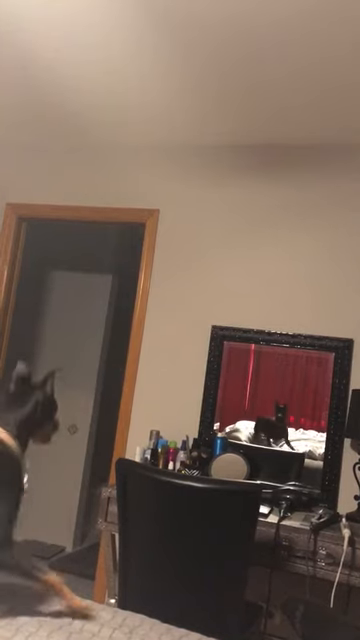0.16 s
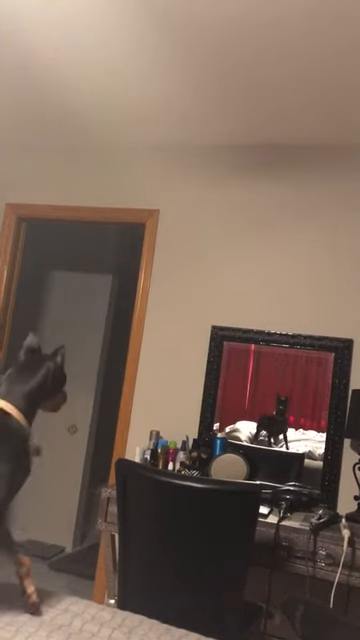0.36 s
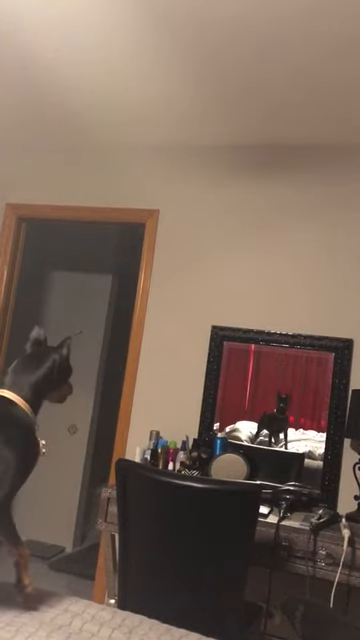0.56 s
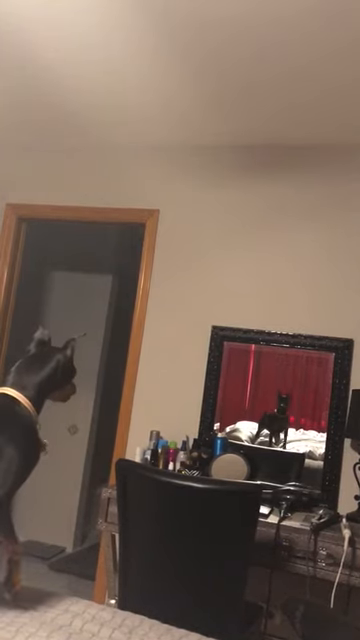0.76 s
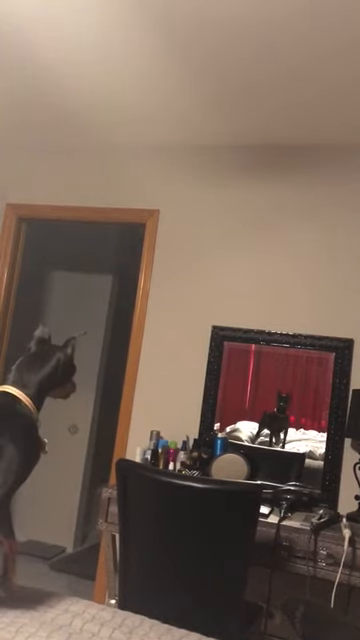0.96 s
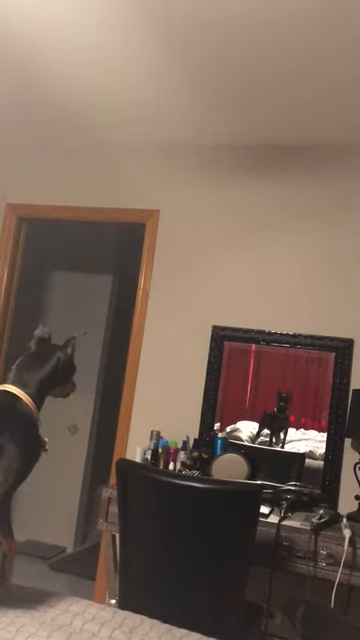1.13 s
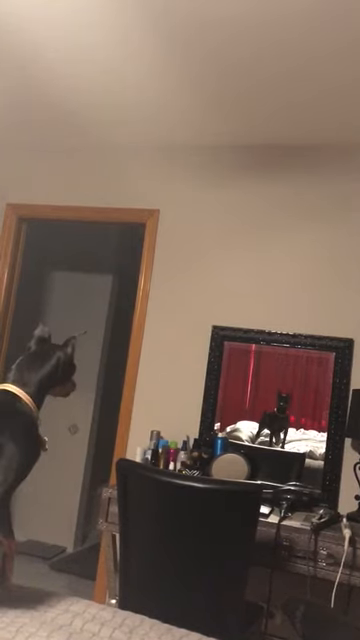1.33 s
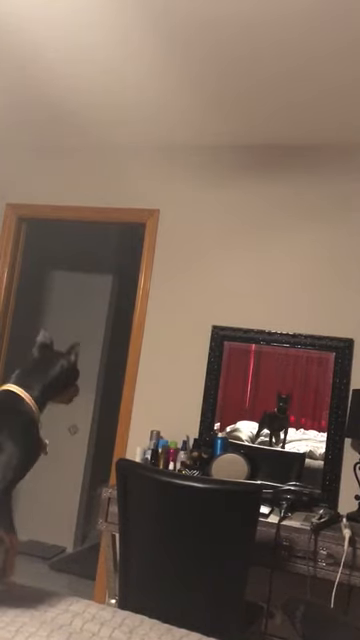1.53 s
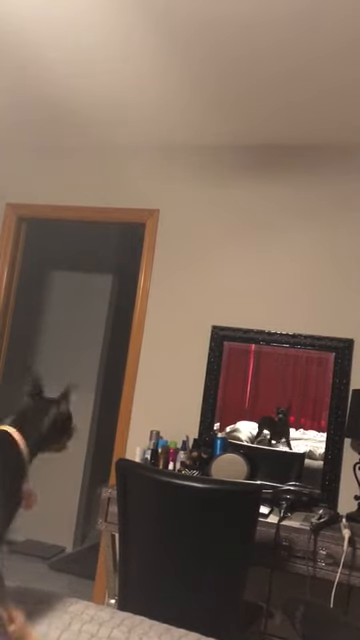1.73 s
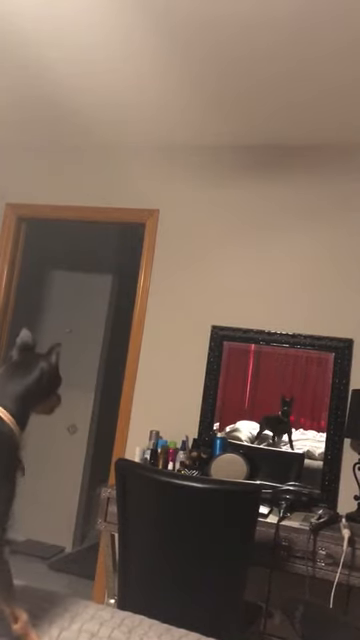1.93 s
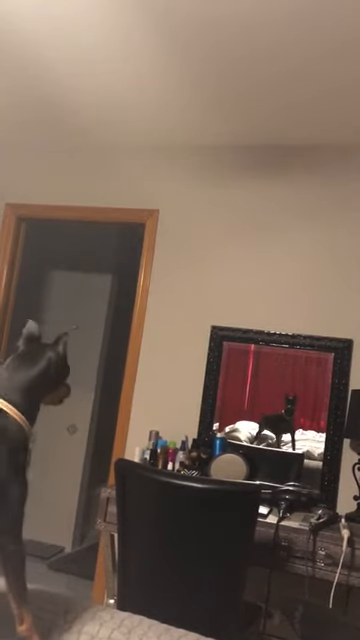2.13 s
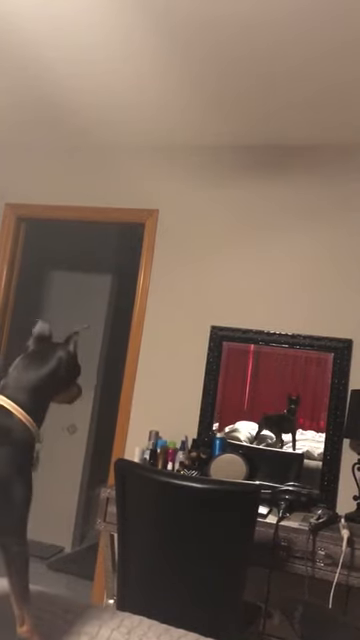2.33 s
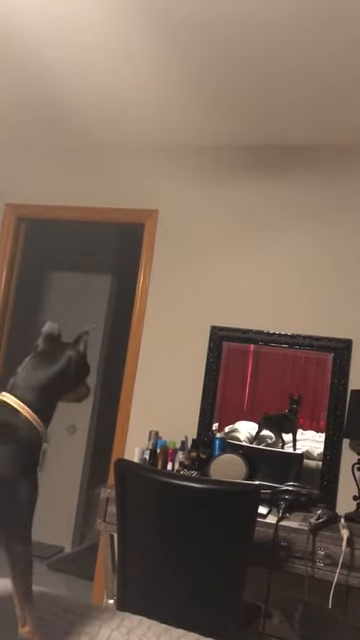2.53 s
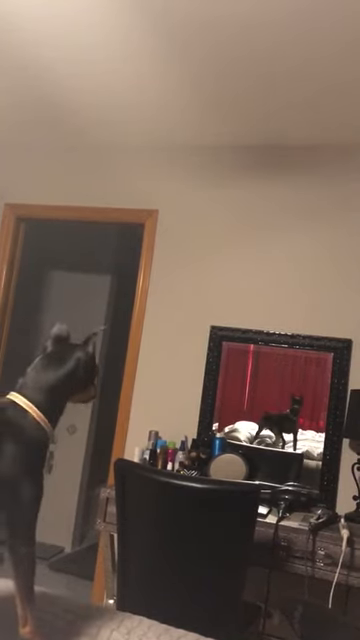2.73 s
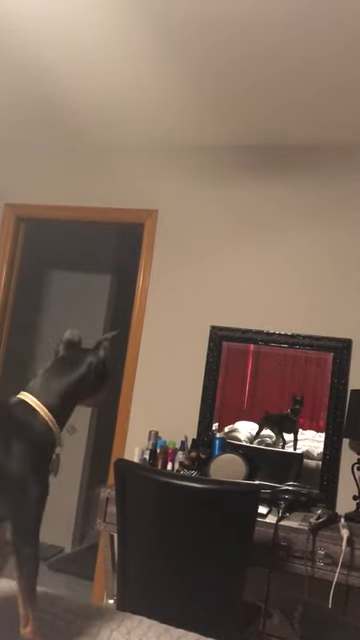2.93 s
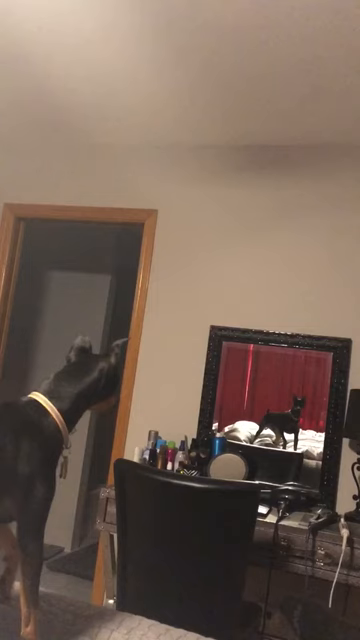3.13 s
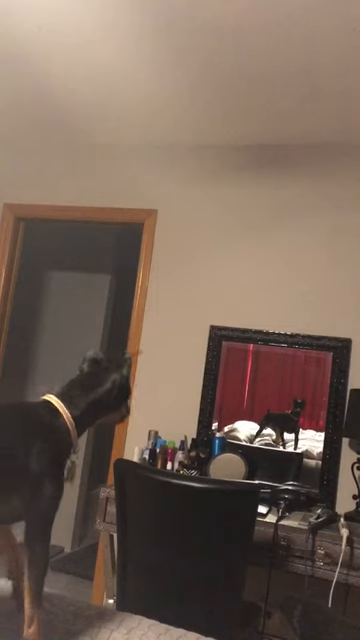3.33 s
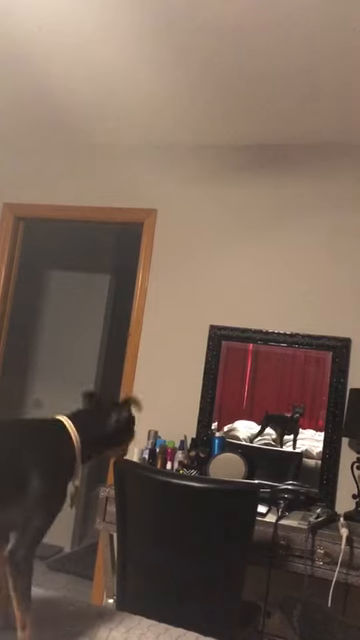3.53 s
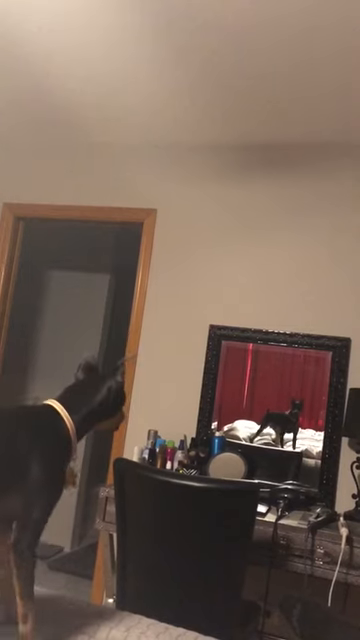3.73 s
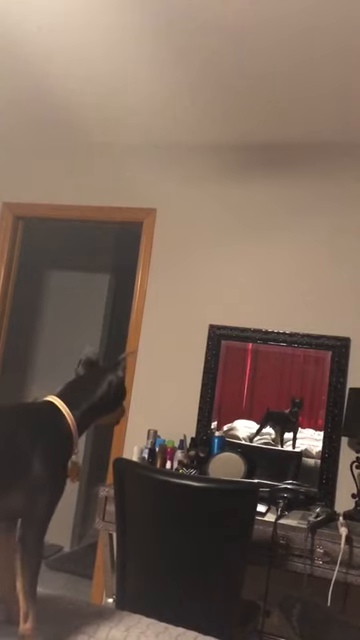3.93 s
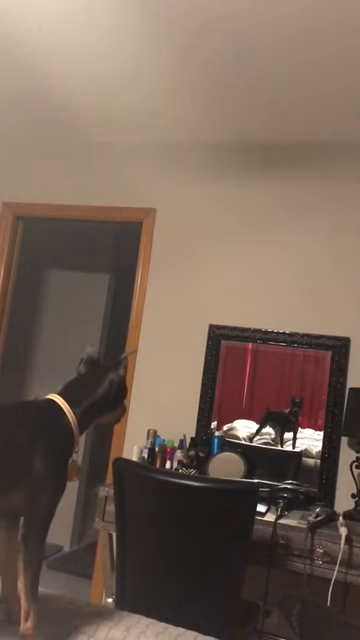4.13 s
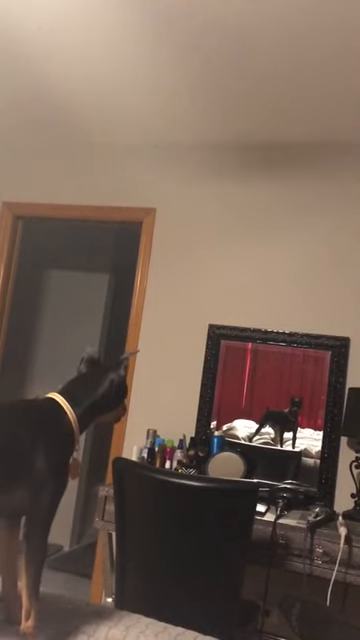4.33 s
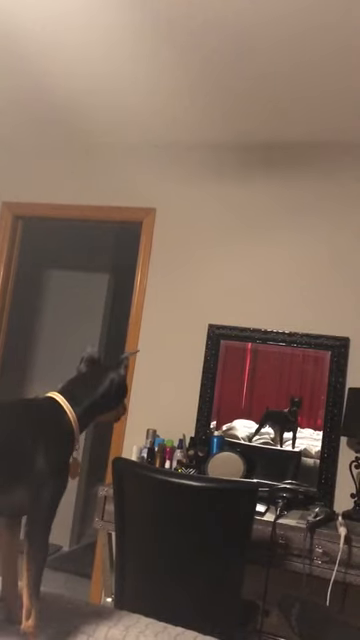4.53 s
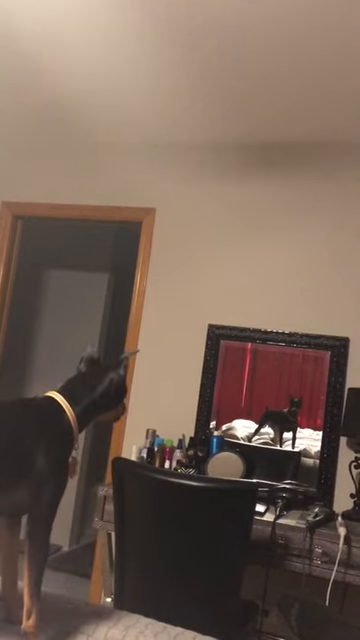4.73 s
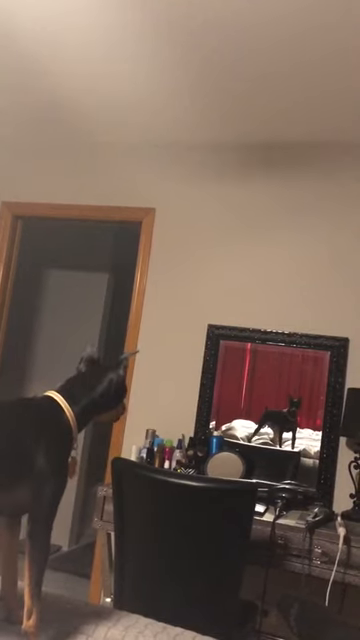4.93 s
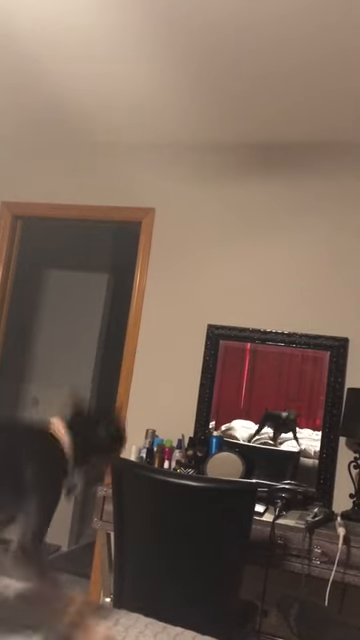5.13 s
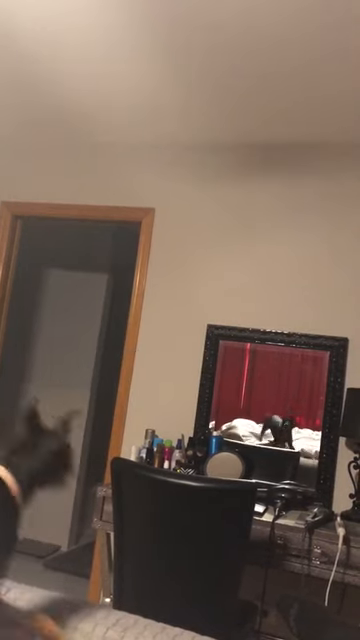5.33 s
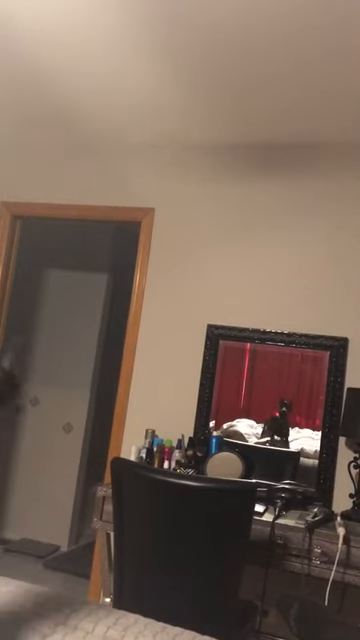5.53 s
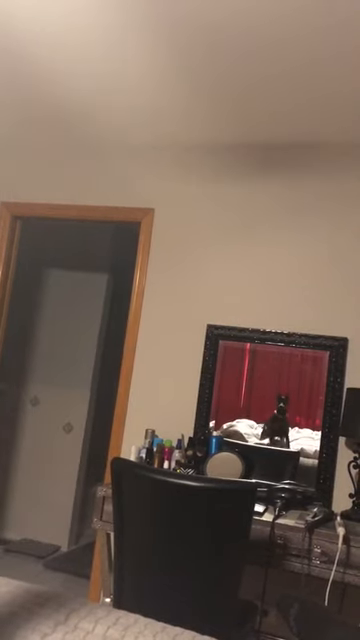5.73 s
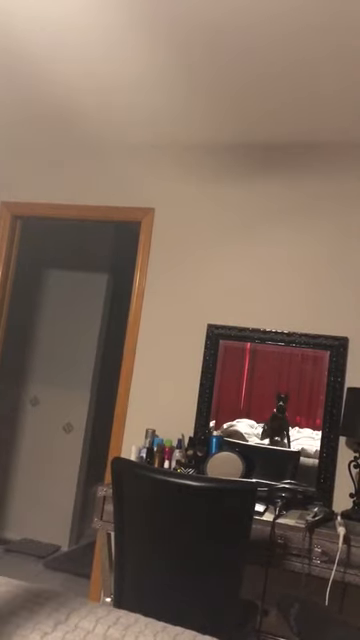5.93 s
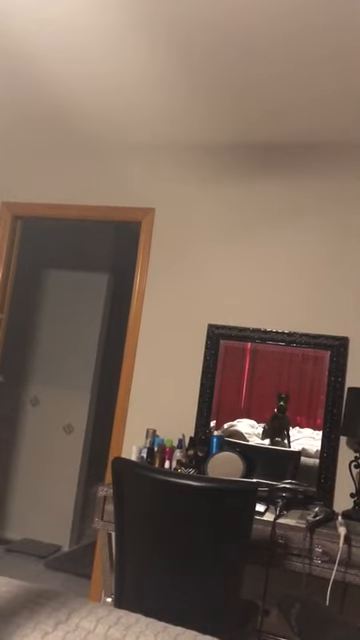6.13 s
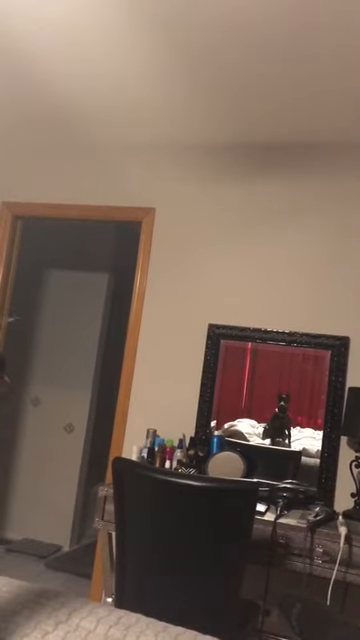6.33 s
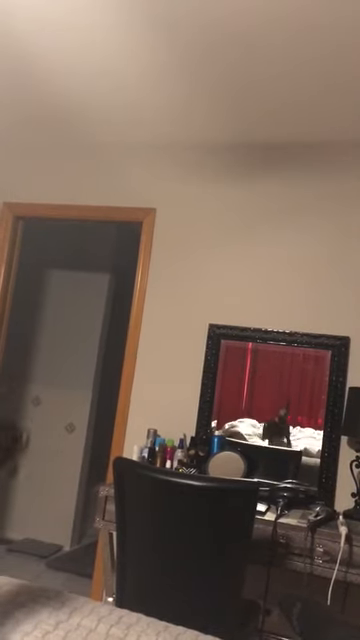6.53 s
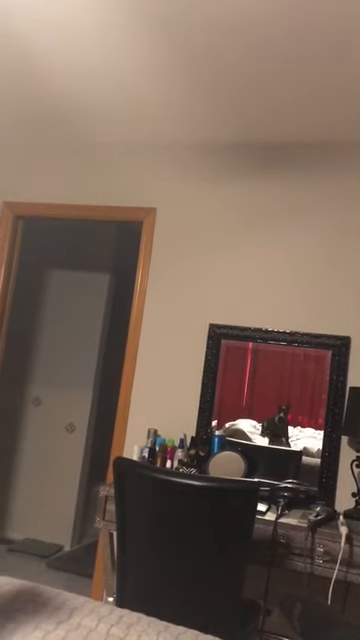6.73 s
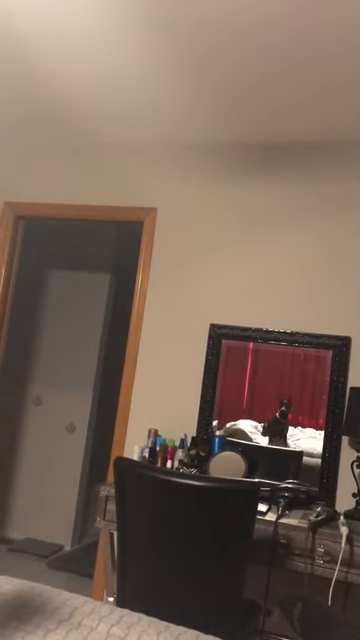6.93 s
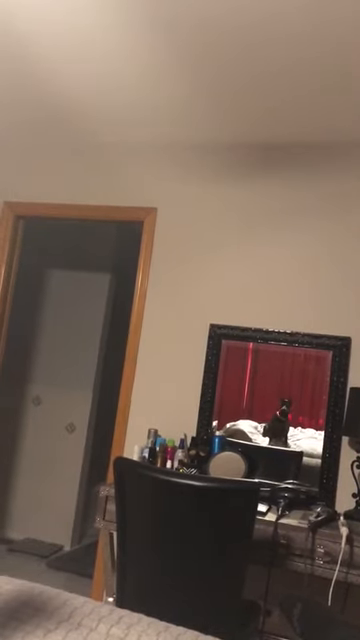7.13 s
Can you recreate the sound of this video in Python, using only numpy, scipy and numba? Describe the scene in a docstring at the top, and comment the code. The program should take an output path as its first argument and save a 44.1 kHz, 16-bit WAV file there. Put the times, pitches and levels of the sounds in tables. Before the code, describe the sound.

Four single raspy dog barks close by indoors, some led in by throaty clicks, with bright tag jingles and quiet mains hum.

```python
"""A small dog barks hoarsely in a bedroom, close to a phone: irregular pulses of the vocal folds and gated breath
drive mouth resonances that rise as the jaw opens. Slow throat clicks lead into the first three full barks.
Collar tags jingle when the dog moves, each contact a click, a ring of small metal discs and a rattle.
A machine hums on the mains over faint room air; bedroom and hallway answer the dog, and the phone limits the peaks."""
import sys
import numpy as np
from scipy import signal
from scipy.fft import rfft, irfft, next_fast_len
from scipy.io import wavfile
from scipy.ndimage import uniform_filter1d, minimum_filter1d, map_coordinates
from numba import njit

SR = 44100
rng = np.random.default_rng(int(sys.argv[2]) if len(sys.argv) > 2 else 0)


def unload_audio(sound):
    """Save the sound as a 16-bit wav file, at the path given as the first command line argument."""
    columns = np.transpose(np.atleast_2d(sound))
    # keep every value between -1 and 1, then stretch to whole-number steps
    steps = np.round(np.clip(columns, -1, 1) * 32767)
    wavfile.write(sys.argv[1], SR, steps.astype(np.int16))


def rack_gain(trim_db):
    """Turn a fader trim in dB into the linear factor to multiply a signal by."""
    fader = np.asarray(trim_db, float)
    return 10 ** (fader / 20)


N = 316197  # samples heard
LEAD = SR // 2  # the dog is rendered from half a second early, so that earlier echoes reach the start
LONG = N + LEAD


def unit(x):
    """Scaled to rms 1."""
    return x / np.sqrt(np.mean(x ** 2) + 1e-20)


def along(points, hz):
    """(Hz, value) points read on a log frequency axis."""
    f, v = np.transpose(points)
    return np.interp(np.log(hz + 1), np.log(f + 1), v)


def filtered(x, response):
    """x times a complex response of frequency."""
    m = next_fast_len(len(x) + 8192)
    spectrum = rfft(x, m) * response(np.fft.rfftfreq(m, 1 / SR))
    return irfft(spectrum, m)[:len(x)]


def wobble(rate):
    """A smooth random curve, rate knots a second."""
    knots = rng.standard_normal(int(N * rate / SR) + 4)
    return map_coordinates(knots, [np.arange(N) * rate / SR])


@njit
def resonance(x, hz, width):
    """A moving two-pole resonance, gain 1 at its centre (hz and width as parts of the sample rate)."""
    y, r = np.zeros(len(x)), np.exp(-np.pi * width)
    for i in range(2, len(x)):
        drive = (1 - r * r) / 2 * (x[i] - x[i - 2])
        y[i] = drive + 2 * r * np.cos(2 * np.pi * hz[i]) * y[i - 1] - r * r * y[i - 2]
    return y


def ring_at(x, hz, width_hz):
    """A narrow peak with steep skirts: four resonances in a row, scaled to rms 1."""
    for widen in (1, 4, 5, 6):
        x = resonance(x, hz / SR, widen * width_hz / SR)
    return unit(x)


def bark(rows, opening_s, parting_db, wide_db, easing_db, third_db, wide, closed, squeak_hz, squeak_db):
    """Irregular fold pulses and gated breath through three moving mouth resonances and the chest."""
    # mouth resonances by jaw (0 shut, 1 wide, 2 easing): jaw, first_hz, second_hz, third_hz
    jaw_table = [(0, 490, 1220, 1830), (.27, 687.2, 1400, 1960), (.6, 750, 1549, 2070),
                 (1, 894, 1572, 2405), (2, 990, 1600, 2324)]
    # what the jaw lets out, relative levels: jaw, chest_db, breath_db, lip_squeak_db
    tone_table = [(0, 2.5, -39, 3), (.22, -6, -44, 1.5), (.5, -32, -28.5, -18), (1.1, -48, -21, -20),
                  (1.6, -40.5, -23, -20.5), (2.2, -38.5, -17.5, -20.5)]
    # third resonance while the jaw opens, relative level: jaw, level_db
    third_table = [(0, -33), (.22, -23), (.5, -8), (1.1, -3.5)]
    # breath spectrum, relative density: frequency_hz, level_db (per Hz)
    breath_spectrum = [(1590, -21.5), (2700, -10.5), (2910, -10), (3350, -10), (4860, -20.5), (5400, -16.5),
                       (5860, -16.5), (8190, -12.5), (9640, -20), (12900, -22.5), (16000, -48)]
    # upper breath resonances: multiple of the third resonance, width_hz, level_db over the plain breath
    upper_peaks = [(1.4, 450.8, -11), (2.55, 400, -19.5), (3.402, 900, -20)]
    s, push_db = np.transpose(rows)
    length = s[-1] - s[0]
    t = np.arange(0, length + .05, 1 / SR)
    effort = np.interp(t + s[0], s, push_db)
    jaw = t / opening_s

    def follow(table):
        """Each column as the jaw moves."""
        places, *columns = np.transpose(table)
        return [np.interp(jaw, places, column) for column in columns]

    first_db = np.interp(jaw, [.3, 1, 1.6], [parting_db, wide_db, easing_db])
    f1, f2, f3 = follow(jaw_table)
    chest, breath, squeak = follow(tone_table)
    top_db, = follow([*third_table, (1.6, third_db)])
    open_share = np.clip(jaw, 0, 1)
    f1 = f1 * wide ** open_share
    f2 = f2 * closed ** (1 - open_share)
    fade = np.clip((length + 0.008 - t) / 0.046, 0, 1) * np.clip(t / .007, 0, 1)

    # the folds speed up at the onset, and their beats scatter in time and strength
    cycle = np.cumsum(np.interp(t, [0, .07], [180, 300])) / SR
    draw = rng.standard_normal((120, 2))
    beats = np.cumsum(np.exp(.25 * draw[:, 0])) - .6
    pulses = np.zeros(len(t) + 1)
    np.add.at(pulses, np.searchsorted(cycle, beats), rack_gain(2.0 * draw[:, 1]))
    pulses = pulses[:-1]
    gate = unit(np.convolve(pulses, np.hanning(120))[:len(t)])  # air rushes just after each opening

    def hiss(steady):
        """Breath noise gated by the folds, over a steady share."""
        return unit((gate + steady) * rng.standard_normal(len(t)))

    rough = 0.26
    folds = (1 - rough) * unit(pulses) + rough * hiss(0.1)
    voice = rack_gain(first_db) * ring_at(folds, f1, 120)
    voice = voice + rack_gain(-2.5) * ring_at(folds, f2, 170)
    voice = voice + rack_gain(top_db) * ring_at(folds, f3, 220)
    voice = voice + rack_gain(-10) * ring_at(hiss(.3), (f1 + f2) / 2, 200)  # rasp fills the valley between the first two
    voice = voice + rack_gain(chest + parting_db) * ring_at(folds, np.full(len(t), 230.), 160)

    lumps = np.interp(cycle, np.arange(0, 120, 3), rng.standard_normal(40))  # the breath comes in uneven gusts
    gusts = rack_gain(3.7 * lumps) * hiss(.9)
    air = unit(filtered(gusts, lambda hz: rack_gain(along(breath_spectrum, hz))))
    air = air + sum(rack_gain(db) * ring_at(air, k * f3, width_hz) for k, width_hz, db in upper_peaks)
    air = air + rack_gain(squeak + squeak_db) * ring_at(hiss(.9), np.full(len(t), float(squeak_hz)), 360)
    return fade * rack_gain(effort) * (voice + rack_gain(breath + 4.0) * air)


def barks():
    """Every bark at its moment, each with its own push of breath, mouth and lips."""
    # the bark that ends just before the start, relative level: time_s, effort_db
    earlier = [(-.31, -10.5), (-.13, -3)]
    # one list a bark, relative level: time_s, effort_db
    efforts = [
        [(1.6, -37.5), (1.634, -17), (1.652, -9), (1.776, -15), (1.79, -18)],
        [(3.46, -47.5), (3.464, -36.5), (3.486, -15.5), (3.532, -9), (3.614, -15.5), (3.626, -16),
         (3.64, -18.5)],
        [(5.125, -34), (5.145, -14), (5.169, -4.5), (5.301, -14.5), (5.33, -15.5)],
        [(6.495, -15.5), (6.505, -18), (6.517, -8), (6.659, -13), (6.67, -15.5)],
    ]
    # each bark's mouth, relative levels: jaw_opening_s, parting_db (first resonance and chest),
    # first_wide_db, first_easing_db, third_easing_db
    mouths = [(0.093, 5.5, -1, -2.5, -11), (.122, -2.5, -5, 4, -15.5), (.105, -2, -4, 3, -24),
              (.094, -5, -5.5, -5, -10), (.075, -9.5, -0.5, -4, -10)]
    # each bark's lips: first resonance multiple when wide, second resonance multiple when shut,
    # squeak_hz, squeak_db (added to what the jaw lets out)
    lip_shapes = [(.97, 1.3, 4950, -10), (.93, 1.04, 2200, -13), (1, .97, 4900, -2),
                  (1.03, 1.02, 5000, -4.5), (1.03, .92, 5250, -2.5)]
    out = np.zeros(LONG)
    for rows, mouth, lips in zip([earlier, *efforts], mouths, lip_shapes):
        call = bark(rows, *mouth, *lips)
        out[LEAD + round(rows[0][0] * SR):][:len(call)] += call
    return out


def tail(decay):
    """A second of echo with energy 1, each frequency dying at its own speed."""
    hz, t, z = signal.stft(rng.standard_normal(SR), SR, nperseg=256)
    fading = z * rack_gain(-60 * t / along(decay, hz)[:, None])
    echo = signal.istft(fading, SR, nperseg=256)[1][:SR]
    return echo / np.linalg.norm(echo)


def room(x, wet_db, far_db, piece=SR // 4):
    """Direct sound plus the walls' and the hallway's answer, which changes as the dog moves."""
    # bedroom decay: frequency_hz, t60_s
    bedroom = [(200, 0.32), (800, 0.26), (1600, 0.27), (2500, 0.26), (4000, 0.33), (8000, 0.22),
               (14000, 0.06)]
    # decay beyond the open door: frequency_hz, t60_s
    hallway = [(300, 0.43), (900, 0.53), (2400, 0.56), (4000, 0.6), (8000, 0.42)]
    out = np.pad(x, (0, 2 * SR))
    for a in range(0, len(x), piece):
        echo = rack_gain(wet_db) * tail(bedroom) + rack_gain(far_db) * tail(hallway)
        wet = signal.fftconvolve(x[a:a + piece], np.pad(echo, (130, 0)))  # the answer lags by 3 ms
        out[a:a + len(wet)] += wet
    return out[LEAD:LONG]


def hum():
    """Slightly unsteady mains lines over the faint air of the room."""
    # the machine's lines, about which level and phase wander: frequency_hz, level_db (rms)
    mains_lines = [(59.2, -66), (118.4, -63.5), (242.2, -80.5), (290.7, -87), (360.7, -84), (662.1, -91),
                   (721.4, -85.5), (839.8, -88.5)]
    # spectrum of the room air, relative density: frequency_hz, level_db (per Hz)
    air_spectrum = [(24, -35.5), (40, -6.5), (124, -11), (144, -5), (176, -13), (297, -14.5), (529, -22.5),
                    (715, -24.5), (790, -25), (1180, -23.5), (2630, -34), (11600, -39.5), (16000, -45)]
    t = np.arange(N) / SR
    lines = np.zeros(N)
    for hz, db in mains_lines:
        level = np.sqrt(2) * rack_gain(db + 1.5 * wobble(1.7))
        lines += level * np.sin(2 * np.pi * hz * t + wobble(4))
    air = unit(filtered(rng.standard_normal(N), lambda hz: rack_gain(along(air_spectrum, hz))))
    return lines + rack_gain(-66 + .7 * wobble(7.1)) * air


def tags():
    """Contacts click and ring small metal discs by where they touch, rebound twice and rattle with light bounces."""
    # the tags meet, relative levels: start_s, click_db, low_ring_db, high_ring_db (both over the click),
    # first_rebound_db (over the first contact)
    jingle = [(-.03, -42.5, -18, -8.5, -2.5), (0.0603, -49, -16, -13.5, -4), (0.104, -36.5, -20, -20, -15),
              (0.1424, -46, -22, -16, -14), (0.1746, -40, -20, -12.5, -1), (0.1999, -31, -36, -24, -21),
              (0.3366, -41.5, -19.5, -11.5, 3), (0.5274, -64.5, -23, -11.5, -6),
              (0.617, -41.5, -21, -15.5, -15), (0.6478, -40.5, -42, -28, -15),
              (0.8051, -50, -15.5, -13, -8), (0.9892, -49.5, -18, -10, -9), (1.1653, -48, -20, -14.5, -13),
              (1.3458, -57.5, -18, -13, -7), (1.8564, -39.5, -28, -19.5, 4), (1.9443, -55, -12, -18, -8),
              (2.0453, -45.5, -19, -13, 0), (2.0702, -37.5, -11.5, -10, -1.5), (2.13, -58, 7, -6, -3.5),
              (2.1874, -52.5, -6, -7, 2.5), (2.227, -51, -23.5, -12.5, -16), (3.9524, -59, -14, -5, -9),
              (5.321, -36.5, -15, -7, -6), (5.4134, -41.5, -24, -3.5, -4),
              (5.4434, -37.5, -13.5, -12.5, -5), (5.5338, -23.5, -29.5, -15.5, -5),
              (5.6111, -34, -22, -11.5, 2.5), (5.7499, -54.5, -20, -5, -2),
              (5.8446, -61.5, -18, -3.5, -10.5), (5.8805, -39, -27, -14.5, -2),
              (6.7384, -47.5, -16, -4.5, -10), (6.8094, -37.5, -16.5, -12, 13.5),
              (6.9716, -41.5, -23, -9.5, -9), (7.016, -30.5, -18.5, -15, -8.5)]
    # modes of the discs, relative level: frequency_hz, level_db, t60_s
    disc_modes = [(5680, -5.5, 0.16), (5840, -9.5, 0.12), (6260, -7, 0.16), (7100, -18, 0.057),
                  (9650, -5, 0.17), (10650, -7.5, 0.056), (11190, -7.5, .04), (13010, -1, .09),
                  (13930, -7, 0.12)]
    rebound_s, later_loss_db = .012, -5
    middle_db, rattle_db = -6.5, 5  # over the high ring
    out, t = np.zeros(LONG + SR), np.arange(SR // 3) / SR
    hz, level, t60 = np.transpose(disc_modes)[:, :, None]

    def bright(low_hz):
        """Treble response: rises up to low_hz, falls away above 14.8 kHz."""
        return lambda f: (f / low_hz) ** 2 / (1 + (f / low_hz) ** 2) / (1 + (f / 14800) ** 12)

    def touch(s, db, low_db, high_db, click_hz):
        """One contact added to the jingle."""
        share = np.select([hz < 8000, hz < 11600], [low_db, high_db + middle_db], high_db)
        share = share + rng.normal(0, 3.7, hz.shape)
        # swinging discs never hold one pitch
        sway = np.cumsum(rng.normal(0, 0.06 * hz / 13000, (len(hz), len(t))), axis=1)
        ring = np.sum(rack_gain(level + share - 60 * t / t60) * np.sin(2 * np.pi * hz * t + sway), axis=0)
        click = rack_gain(-2.5 - 60 * t / .0035) * filtered(rng.standard_normal(len(t)), bright(click_hz))
        hits = rng.random(len(t)) < 150 / SR  # about 150 light bounces a second
        bounces = np.convolve(hits, rack_gain(-60 * t[:200] / 0.00446))[:len(t)]
        grain = filtered(rng.standard_normal(len(t)), bright(11000))
        rattle = (bounces + 0.74) * rack_gain(high_db + rattle_db - 60 * t / .13) * grain
        out[LEAD + round(s * SR):][:len(t)] += rack_gain(db + 3.5) * (rack_gain(-2.5) * ring + click + rattle)

    for s, db, low_db, high_db, rebound_db in jingle:
        touch(s, db, low_db, high_db, 3700)
        for k in (1, 2):
            touch(s + k * rebound_s, db + rebound_db + later_loss_db * (k - 1), low_db, high_db, 6500)
    return out[:LONG]


def growl():
    """Slow, soft double slaps of the folds behind a shut mouth, each with a puff through the nose."""
    # slow fold pulses before a bark, relative levels: start_s, slap_db, nasal_puff_db, thin_whistle_db (over the slap)
    slow_pulses = [(1.417, -42, -1.5, -11.5), (1.448, -33.5, -4, -21), (1.48, -34.5, -5.5, -15.5),
                   (1.51, -35, -5, -17), (1.549, -40, 0, -23), (1.577, -29, -2, -29),
                   (3.401, -32.5, 5.5, -3), (3.434, -32.5, -1.5, -19), (5.099, -35.5, 11.5, -28)]
    # resonances of the shut mouth, relative level: frequency_hz, width_hz, level_db
    throat_modes = [(280, 270, 2.5), (520, 300, 2.5)]
    # resonances of the nose, relative level: frequency_hz, width_hz, level_db
    nose_modes = [(750, 270, -5), (1050, 120, -0.5), (1350, 200, -10), (1950, 150, -14.5)]
    slaps, puffs, whistle = np.zeros((3, LONG))
    t = np.arange(SR // 20) / SR
    for s, db, nose_db, whistle_db in slow_pulses:
        # the folds slap twice
        slaps[LEAD + round((s + .002) * SR)] = rack_gain(db + 35.5)
        slaps[LEAD + round((s + .012) * SR)] = rack_gain(db + 29.5 + rng.normal(0, 1.8))
        puff = (1 - np.exp(-t / .002)) * rack_gain(-60 * t / .08) * rng.standard_normal(len(t))
        puffs[LEAD + round(s * SR):][:len(t)] += rack_gain(db + nose_db) * puff
        whistle[LEAD + round(s * SR):][:len(t)] += rack_gain(db + whistle_db) * puff

    def peaks(modes):
        """Sum of resonances, each passed twice."""
        return lambda f: sum(rack_gain(db) * (1j * f * w / (c * c - f * f + 1j * f * w)) ** 2 for c, w, db in modes)

    soft = filtered(slaps, lambda hz: 1 / (1 + 1j * hz / 900) ** 4)
    voiced = filtered(soft, peaks(throat_modes))
    nasal = filtered(puffs, peaks(nose_modes))
    return voiced + nasal + filtered(whistle, peaks([(3050, 120, 0.00094)]))


def scene():
    """Dog and tags in the room, over the hum; the deep growl excites the soft room less than the barks do."""
    mix = room(rack_gain(2.5) * barks(), wet_db=-2.5, far_db=-19.0)
    mix = mix + room(growl(), wet_db=-5.5, far_db=-32.5)
    mix = mix + room(tags(), wet_db=-9.5, far_db=-15.5)
    return (mix + hum())[None]


@njit
def held(need, release):
    """Gain drops at once and comes back slowly."""
    g = need.copy()
    for i in range(1, len(g)):
        g[i] = min(need[i], g[i - 1] + (1 - g[i - 1]) * release)
    return g


def top_cut(x):
    """Nothing passes above the cut-off."""
    return signal.sosfilt(signal.butter(12, 16510, fs=SR, output="sos"), x)


def record(dry):
    """The phone cuts deep bass; gain control backs off after loud sound and returns slowly; a limiter holds the peaks."""
    x = filtered(dry[0], lambda hz: (1j * hz / 45 / (1 + 1j * hz / 45)) ** 3)
    loud = np.sqrt(np.abs(uniform_filter1d(x ** 2, size=441))) + 1e-9  # rms over 10 ms
    wanted = np.minimum(1, 0.32 / loud) ** 0.72
    x = x * uniform_filter1d(held(wanted, 1 / (.9 * SR)), size=221)  # returns over .9 s
    need = np.minimum(1, .7 / (np.abs(x) + 1e-9))
    x = x * uniform_filter1d(held(minimum_filter1d(need, size=89), 1 / (0.01 * SR)), size=45)  # returns over 10 ms
    return top_cut(x[None])


dry = scene()
out = record(dry)
unload_audio(out)
```